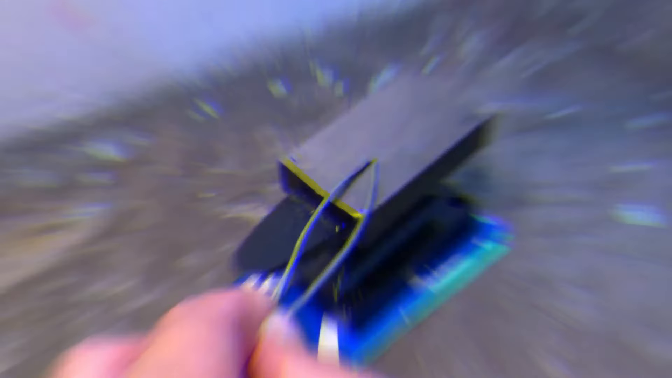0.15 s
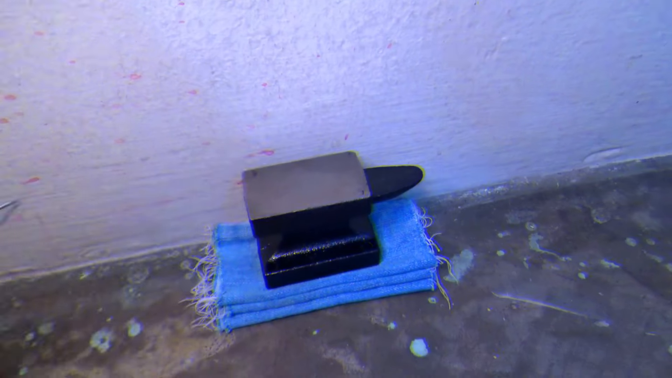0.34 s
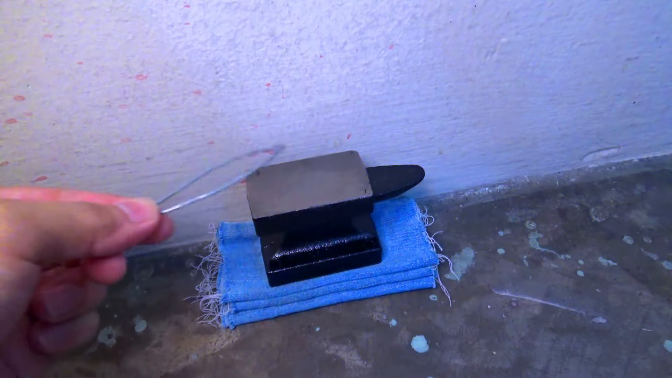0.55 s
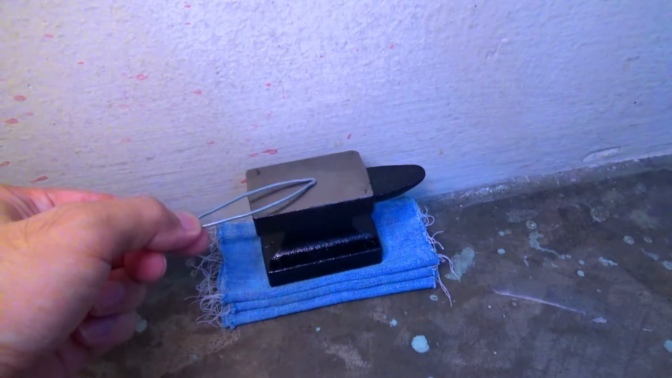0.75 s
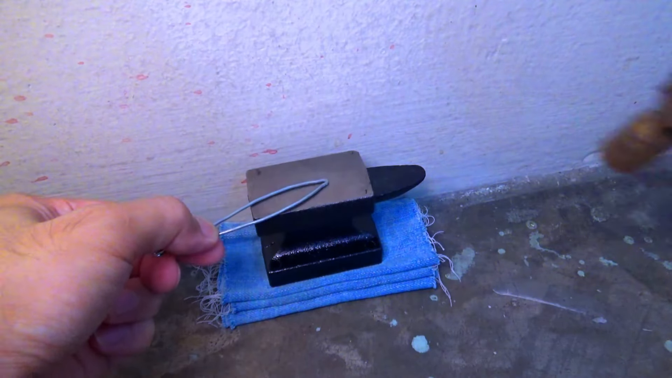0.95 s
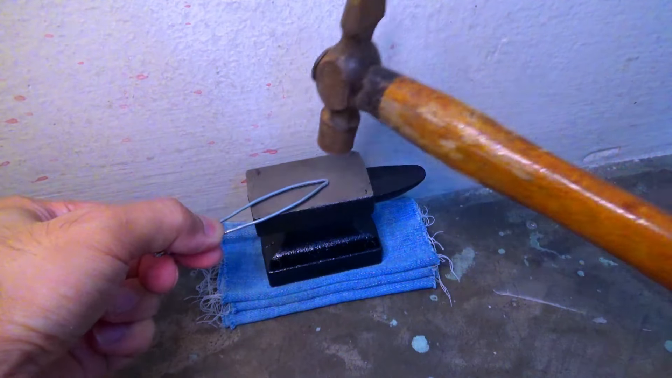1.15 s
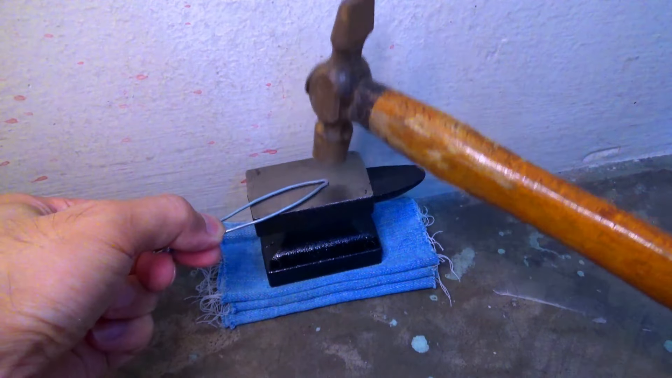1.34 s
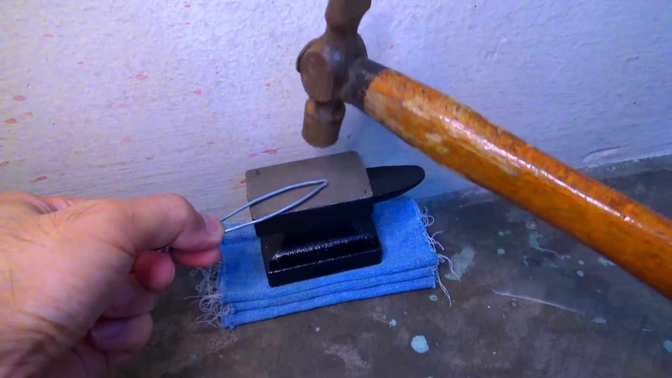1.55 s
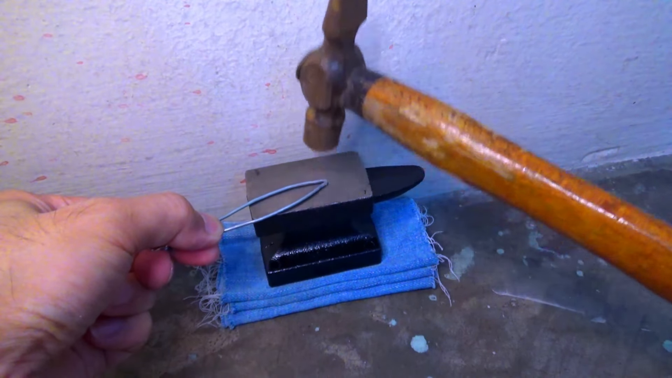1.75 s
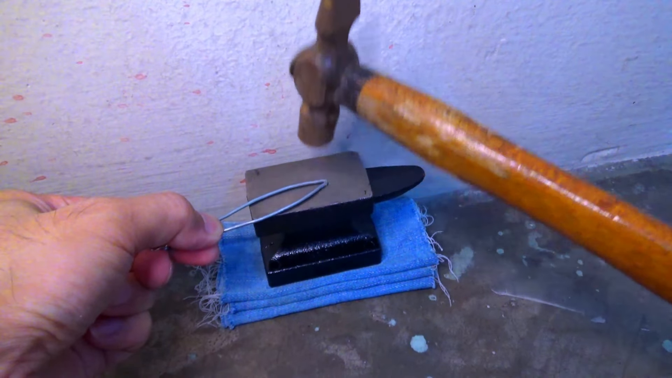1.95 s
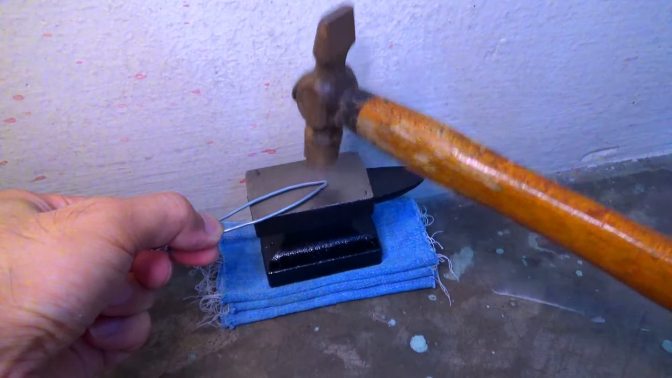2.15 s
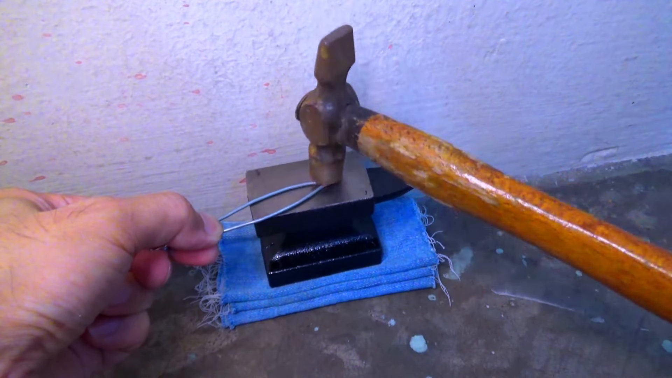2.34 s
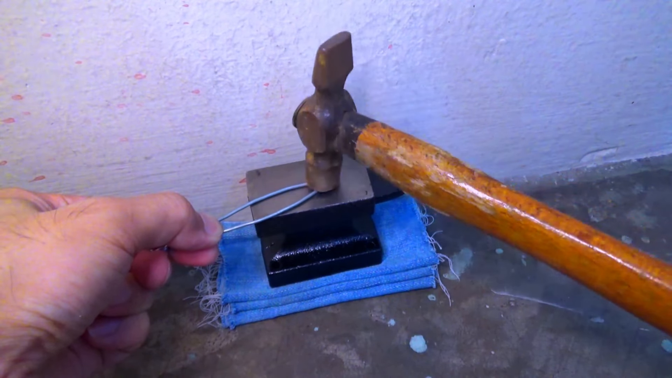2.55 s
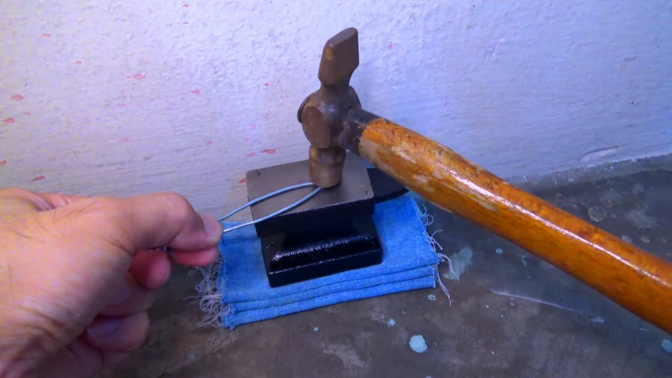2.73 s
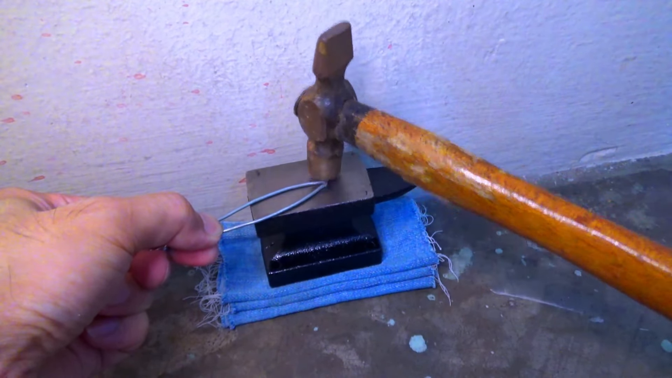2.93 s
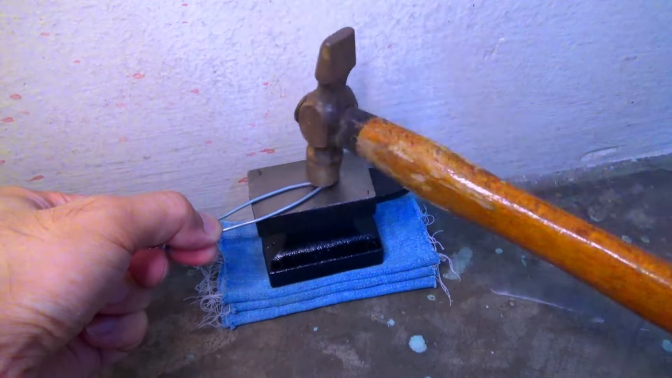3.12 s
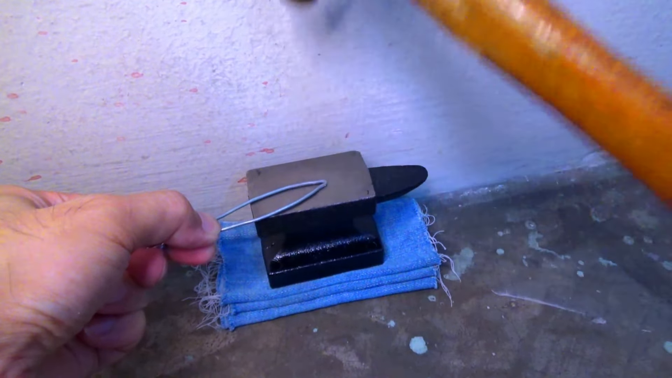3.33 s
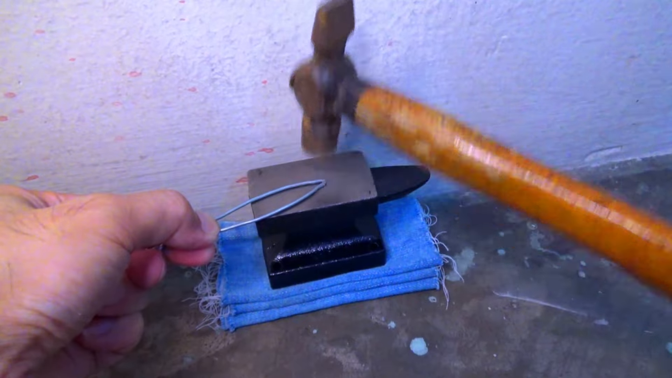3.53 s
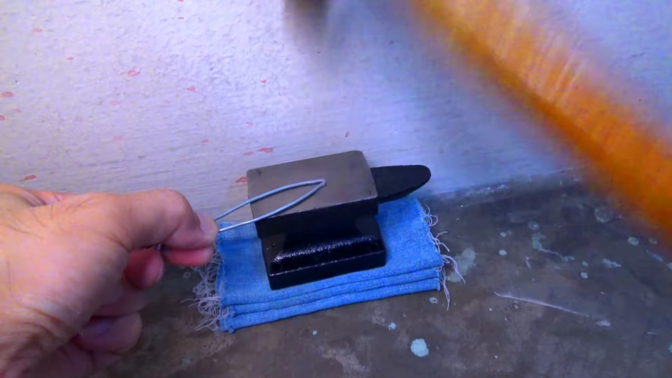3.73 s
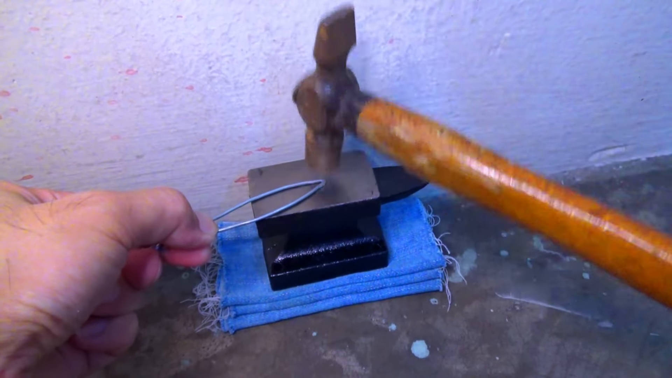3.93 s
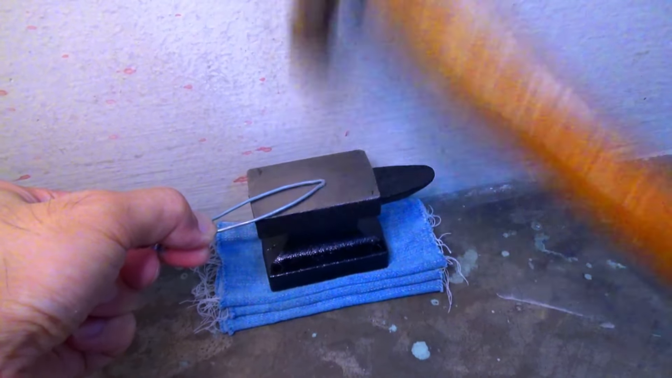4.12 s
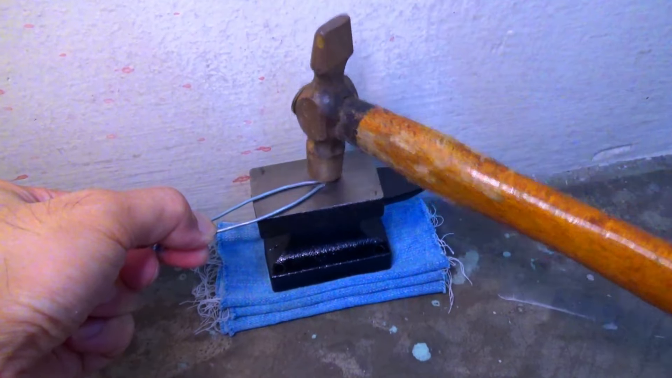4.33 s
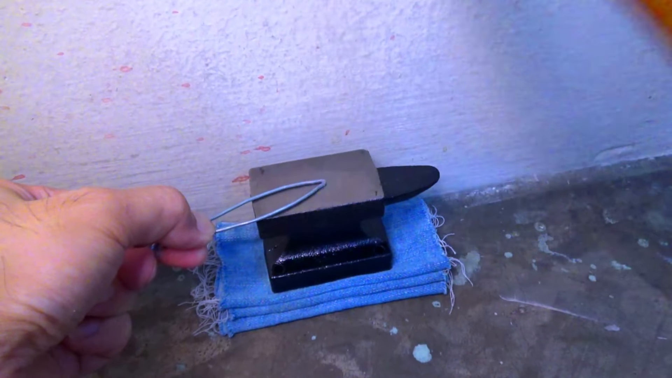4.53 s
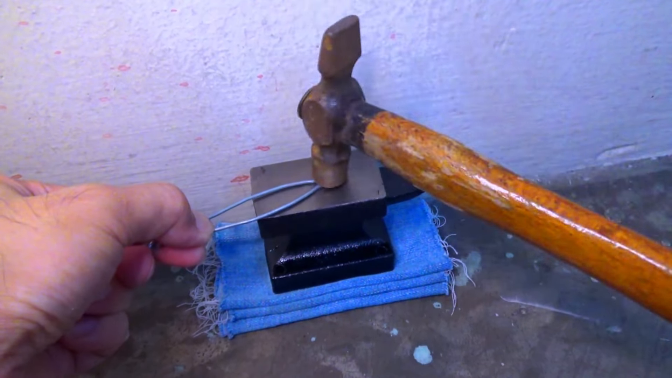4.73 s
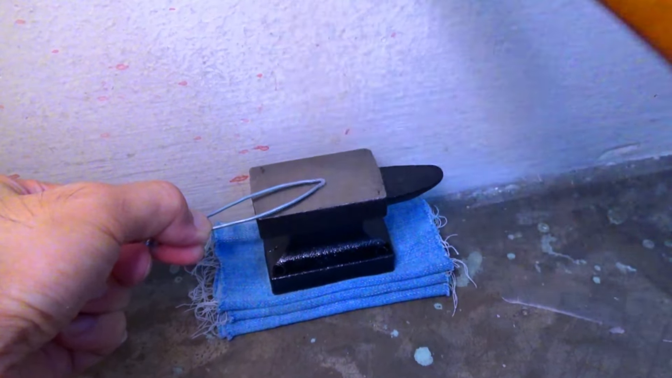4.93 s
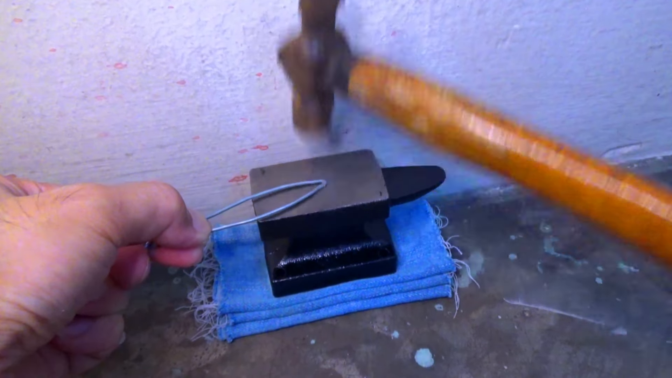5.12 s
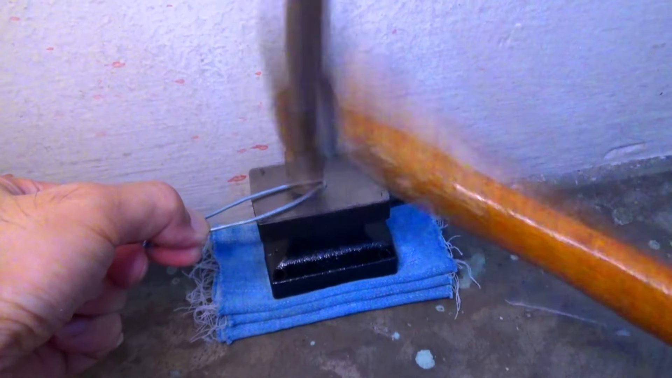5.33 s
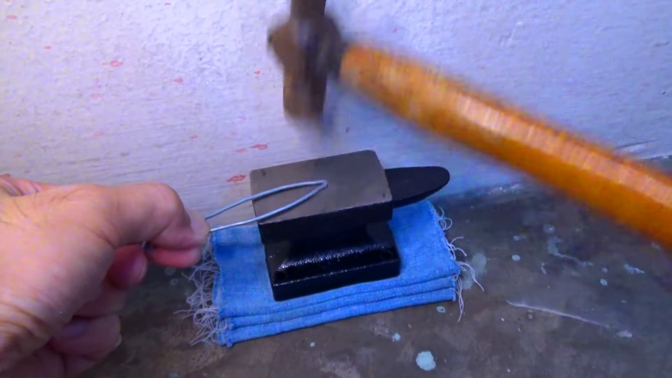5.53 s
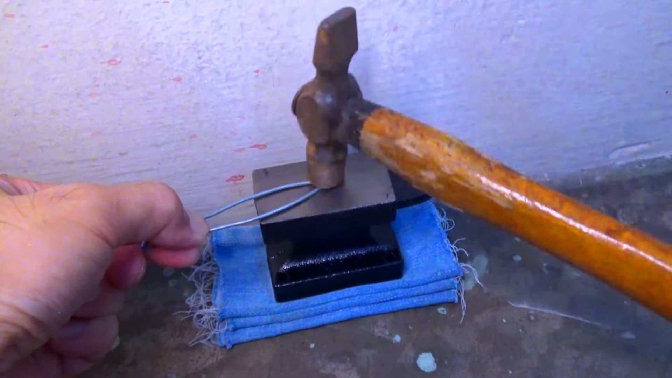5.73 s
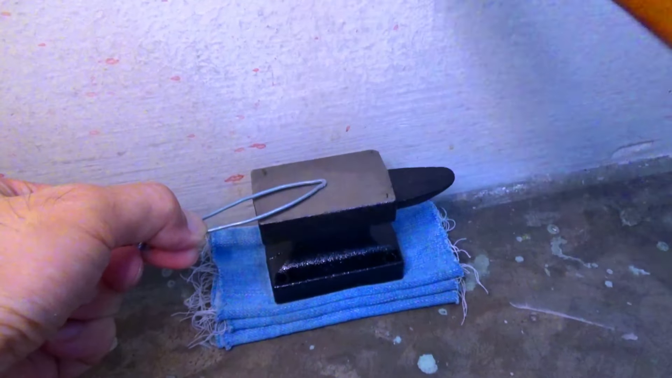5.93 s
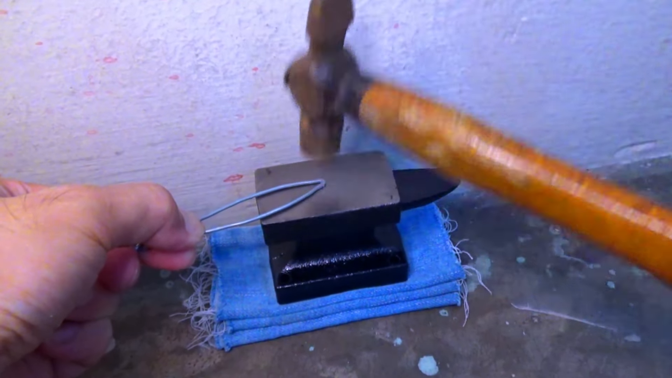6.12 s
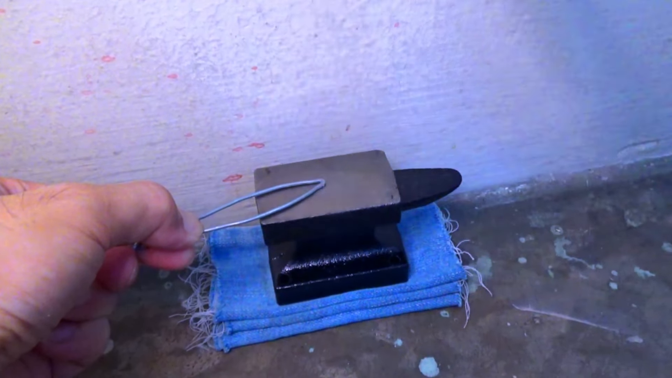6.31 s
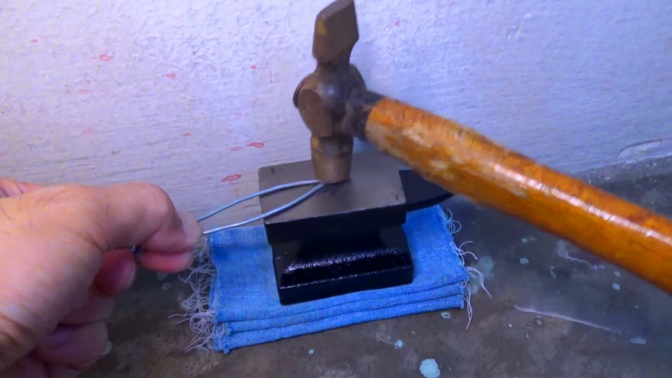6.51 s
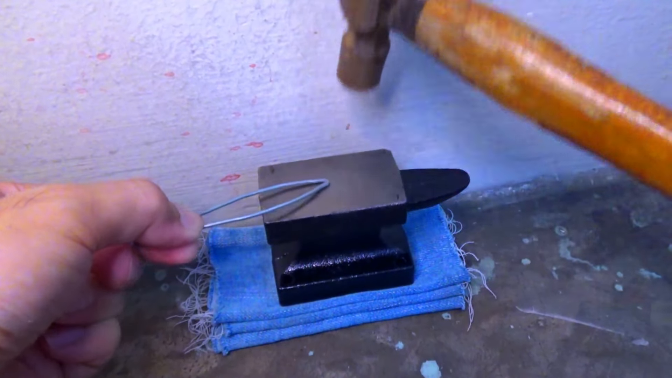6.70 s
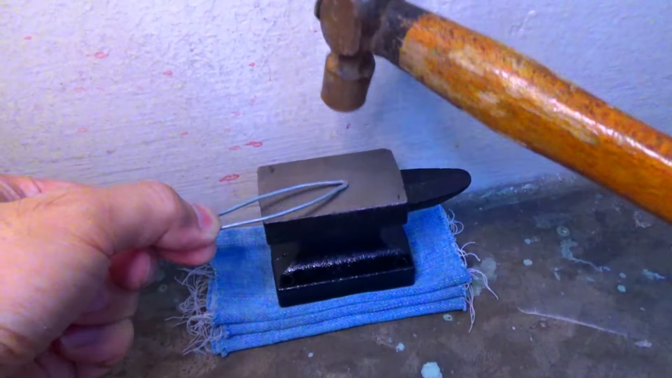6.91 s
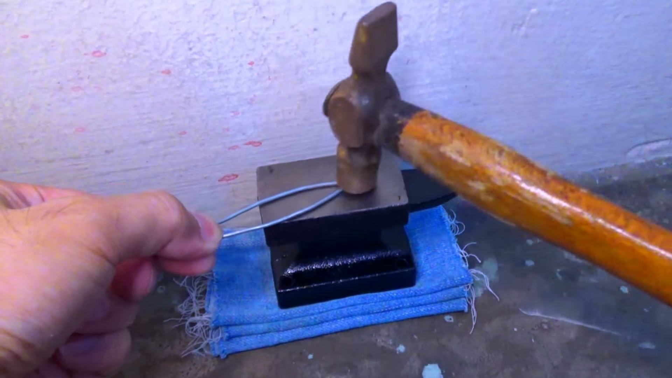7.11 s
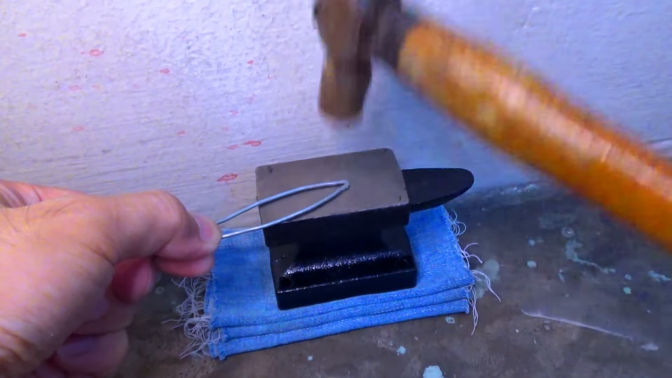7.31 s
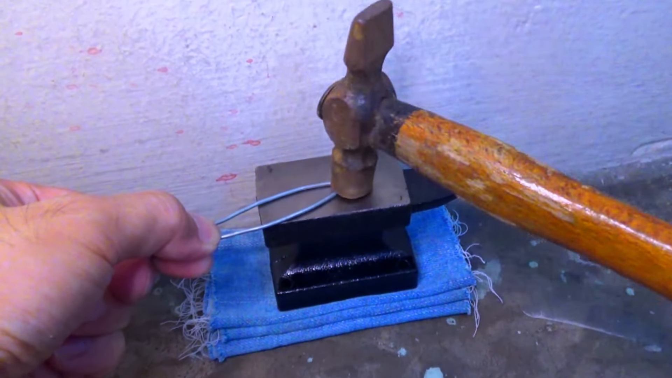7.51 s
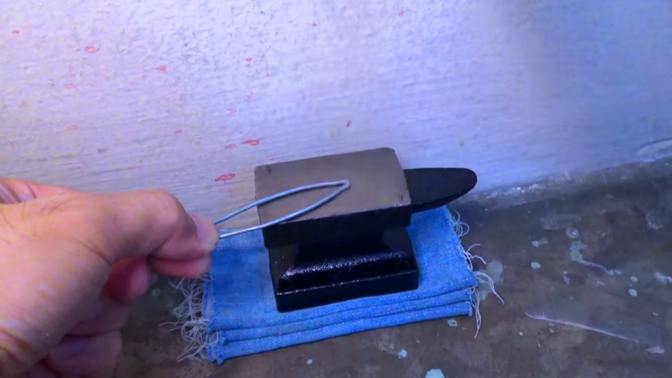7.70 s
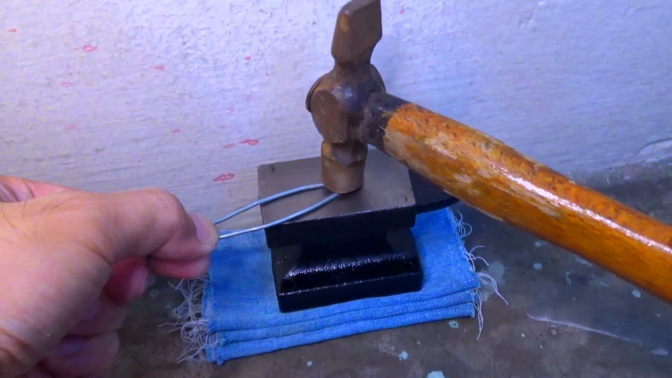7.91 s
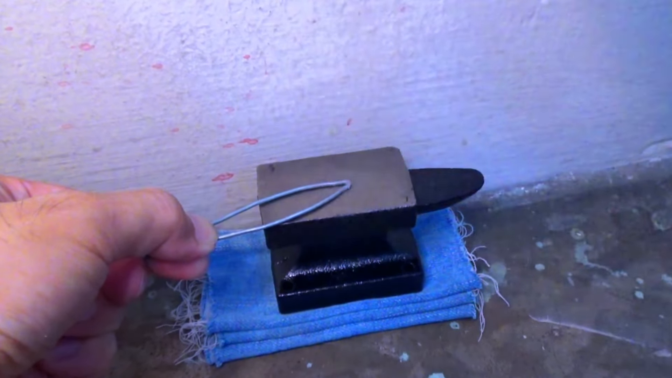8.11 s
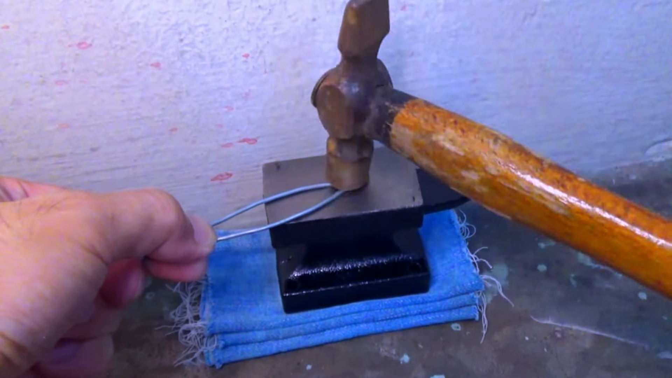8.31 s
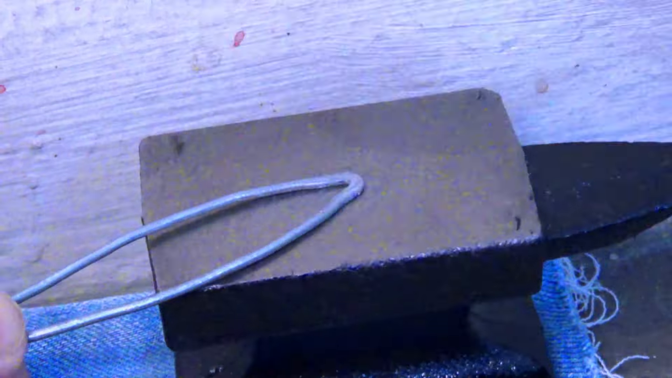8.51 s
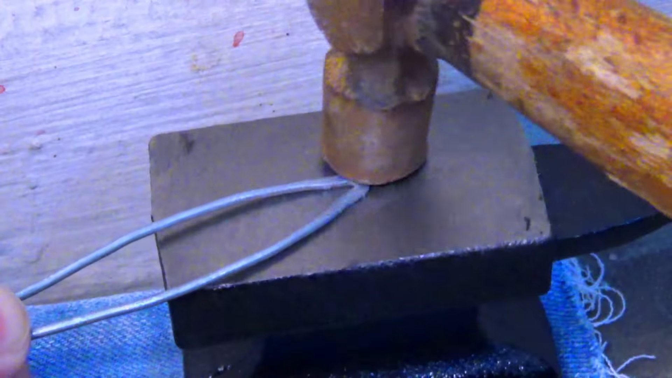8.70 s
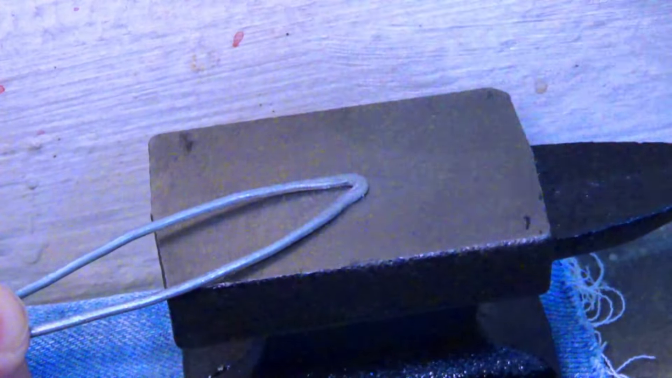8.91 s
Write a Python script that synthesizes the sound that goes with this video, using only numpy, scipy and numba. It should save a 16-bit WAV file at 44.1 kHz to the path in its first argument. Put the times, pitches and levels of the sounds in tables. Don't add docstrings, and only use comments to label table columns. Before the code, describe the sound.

A loud hammer clang is already ringing at the start, with a hollow mid-pitched hum and raised air noise, until a rapid stutter chops it off at about 0.3 s. Near quiet follows: faint touches and a brief singing scrape of wire on steel around 0.75-1.05 s, a light tap at 1.35 s. From 1.47 s a hammer beats the small anvil, softly at first, about five blows a second, with small tinkles near 2.6-2.9 s. From 3.16 s the blows are hard, bright cracks with short high steel rings, 0.3-0.4 s apart, growing brighter until 6.5 s. After a short pause come two softer hits at 7.1 and 7.4 s, then strong ones at 7.8, 8.2 and 8.7 s. Hard room reflections follow every blow, their tails held flat and dense. Beneath lie murmuring air, a faint low engine near 7.5-8.2 s and a distant whirr after 8.5 s.

```python
import sys
import numpy as np
from scipy import signal
from scipy.fft import rfft, irfft
from scipy.io import wavfile
from scipy.ndimage import uniform_filter1d, minimum_filter1d
from numba import njit

SR = 44100
rng = np.random.default_rng(int(sys.argv[2]) if len(sys.argv) > 2 else 0)


def convert_level_to_amplitude(level_db):
    exponent = np.asarray(level_db, float) / 20
    return 10 ** exponent


def transcribe(signal):
    frames = np.atleast_2d(signal).T
    limited = np.clip(frames, -1, 1)
    pcm = np.round(limited * 32767).astype(np.int16)
    wavfile.write(sys.argv[1], SR, pcm)


N = 394694
LEAD = 4410
CHANGE_S = .306

# start in [s], strength in [dB],
# body ring in [dB], face ring in [dB], head ring in [dB].
BLOWS = [(-0.02, -1, -22, -33, 3), (1.4713, -16.5, -36, -41, -56), (1.6911, -12.5, -1.5, -5, -10),
         (1.906, -9.5, -0.5, -3.5, -31), (2.1075, -5.5, 3.5, 0, -2.5), (2.3178, -4.5, 1.5, -4, -10),
         (2.542, -5.5, 2, 2, 3.5), (2.7434, -9.5, 1, -5, -28), (3.1612, -1, 3.5, -9, 5.5),
         (3.4529, 1, 5, -4, -4.5), (3.825, 2, 0, 0, -14), (4.2168, 2, -7, -5, 5.5),
         (4.6545, 2, 1.5, -0.5, -0.5), (5.0657, 0, 3, 4.5, -24), (5.4002, 0, 3.5, -2.5, -8),
         (5.7654, 0.5, 2.5, 5.5, -5), (6.0637, 1, -2, 9.5, 2), (6.4765, 1, -5, 13.5, -3.5),
         (7.121, -12.5, 2.5, -5.5, -6), (7.4093, -7.5, -3.5, 0, -13), (7.8241, 1, -2, 2.5, 0),
         (8.2416, 1, 2, 3, 1), (8.6816, -0.5, -9, 6, -2)]
# start in [s], strength in [dB], brightness in [dB],
# head ring in [dB].
TOUCHES = [
    (0.74, -38, 18.5, 19),
    (1.012, -46, 8, 13),
    (1.355, -26.5, 2.5, -3),
    (2.567, -19, 2, -21),
    (2.765, -16.5, 10, -24),
    (2.872, -21, 4, -32),
]
# pitch in [Hz], level in [dB], T60 in [s],
# partner pitch in [Hz], partner level in [dB].
STEEL_RINGS = [
    (4572, 2.5, .12, 4552, -9),
    (7466, 2.5, .085, 7440, -7),
    (11112, 1, .05, 11145, -5),
]
# pitch in [Hz], level in [dB], T60 in [s], # growth with blow
# strength in [dB per dB].
MINOR_MODES = [(257, -25, 0.05, 1.5), (408, -19, 0.05, 1.2), (724, -19, 0.12, 0.87), (930, -14, 0.09, 0.71),
               (1388, -15, 0.15, 1.2), (1976, -12, 0.1, 1.0), (1890, -18, .06, 1.0),
               (9600, -4, 0.046, 1.37), (10700, -14, 0.13, .8), (13400, -25.5, .09, .6),
               (14800, -24.5, 0.086, .6)]
# pitch in [Hz], level in [dB], T60 in [s].
WIRE_MODES = [(1350, -3, .07), (2160, -3, .045), (3820, -22, .05), (5800, -30, .1), (7260, -18, .04),
              (9520, -22, .1)]
# centre in [s], scrape in [dB], singing in [dB].
WIRE_SLIDES = [
    (.76, -65, -15),
    (0.861, -63.5, 10.5),
    (1.03, -65.5, -18),
    (1.429, -71, -22),
]
# frequency in [Hz], level in [dB per Hz].
CRACK_COLOUR = [(40, -68), (120, -24.5), (260, -18.5), (500, -13), (1000, -3), (2000, 2.5), (3500, 4.5),
                (6000, 1.5), (10000, -2.5), (11500, -20.5), (12500, -29.5), (15000, -21.5), (16500, -45)]
# frequency in [Hz], level in [dB per Hz].
TAP_COLOUR = [(40, -89), (200, -24), (500, 4), (1000, 12), (3000, -0.5), (6000, -7.5), (10000, -5),
              (12000, -21), (16500, -29)]
# frequency in [Hz], level in [dB].
ROOM_COLOUR = [(150, 1), (400, 7.5), (900, 2), (1900, 5.5), (2800, -2), (3700, 3), (5000, -6), (8000, -3.5),
               (11000, -9.5), (15000, 12.5)]
# frequency in [Hz], T60 in [s].
ROOM_T60 = [(200, 0.48), (700, 0.28), (2000, 0.42), (5000, 0.41), (10000, 0.35), (12500, 0.36),
            (15500, 0.034)]
# delay in [s], level in [dB].
ECHOES = [(.0015, 5.5), (.0035, -1.5), (.020, -8.5), (0.027, -33), (0.033, -21), (0.0358, -4.5),
          (0.057, -24), (0.069, -11.5)]
# frequency in [Hz], left-right likeness in [0 to 1].
LIKENESS = [(60, 0.96), (150, 1), (380, 0.99), (950, 0.85), (2380, 0.61), (5980, 0.8), (15000, 0.97)]
# frequency in [Hz], left minus right in [dB].
LEAN = [(60, 0.5), (180, 0), (550, -0.5), (1650, -1), (4970, -0.5), (15000, 1.5)]
# frequency in [Hz], level in [dB per Hz].
AIR_COLOUR = [(20, -38), (39, -17), (60, -15), (99, -35), (125, -2.5), (200, -2), (310, -3), (480, -8.5),
              (760, -1), (1300, -5), (4000, -19), (10000, -29.5), (13000, -51), (16500, -34)]
# time in [s], level in [dB].
AIR_LEVEL = [(.3, -54.5), (1.3, -52), (1.6, -48), (3.0, -47), (7.0, -50.5), (8.95, -47)]
# start in [s], length in [s], edges in [s], level in [dB].
ENGINE = (7.5, .72, .06, -65)
# start in [s], length in [s], level in [dB].
WHIRR = [
    (8.564, .2, -56),
    (8.856, 0.086, -45.5),
]
# start in [s], depth in [dB], hold in [s], recovery in [s].
DROPOUTS = [
    (.295, 23, .0195, .0005),
    (.305, 37, .0095, .0005),
    (.3195, 30, 0, .017),
    (.339, 16, .002, .01),
]


def blows():
    s, db, *rings = np.transpose(BLOWS)
    worked_s = np.where(s < 0, 4, s)
    bright_db = 2.5 + 0.71 * db + 1.0352 * worked_s
    return np.transpose([s, db, bright_db, *rings])


def touches():
    body_db, face_db = -25, -21
    return [(s, db, bright_db, body_db, face_db, head_db) for s, db, bright_db, head_db in TOUCHES]


def contact_clicks(rows, at, split_hz):
    size = 176
    crumbs = .07 * rng.standard_normal((len(rows), size)) * np.exp(-np.arange(size) / 50)
    clicks, bright, sizzle = np.zeros((3, N + LEAD))
    for i, row, crumb in zip(at, rows, crumbs):
        contact = crumb + (np.arange(size) == 0)
        strength_db, bright_db = row[1:3]
        clicks[i:i + size] += convert_level_to_amplitude(strength_db) * contact
        bright[i:i + size] += convert_level_to_amplitude(strength_db) * (convert_level_to_amplitude(bright_db) - 1) * contact
        sizzle[i:i + size] += convert_level_to_amplitude(0.7 * strength_db + 0.2 * bright_db - 14.0) * contact
    clicks += butter(bright, 2, split_hz, "high")
    return clicks + butter(sizzle, 4, 11800, "high")


def smear(x, gain):
    for lag in (5, 13, 29):
        loop = np.r_[1, np.zeros(lag - 1), gain]
        x = signal.lfilter(loop[::-1], loop, x)
    return x


def strike(rows, colour, crack_db, ring_db, split_hz):
    rows = np.array(rows)
    at = np.round(rows[:, 0] * SR).astype(int) + LEAD
    strength_db = rows[:, 1]
    clicks = contact_clicks(rows, at, split_hz)
    rattle = smear(clicks + 1e-18, gain=0.83)
    crack = convert_level_to_amplitude(crack_db) * signal.fftconvolve(rattle, causal_pulse(colour))[:N + LEAD]
    spread_db = rng.normal(0, 2.5, (len(rows), len(MINOR_MODES)))
    rings, low_modes = np.zeros((2, N + LEAD))
    push = np.zeros(N + LEAD)
    for (hz, db, t60, partner_hz, partner_db), own_db in zip(STEEL_RINGS, rows[:, 3:].T):
        push[at] = convert_level_to_amplitude(strength_db + db + own_db + ring_db)
        rings += ring(push, hz, t60) + convert_level_to_amplitude(partner_db) * ring(push, partner_hz, t60)
    for (hz, db, t60, growth), own_db in zip(MINOR_MODES, spread_db.T):
        grown_db = np.minimum(growth * strength_db, strength_db + 8.9)
        push[at] = convert_level_to_amplitude(grown_db + db + own_db + ring_db)
        part = low_modes if hz < 2500 else rings
        part += ring(push, hz, t60)
    return crack, rings, low_modes


def wire():
    t = (np.arange(N + LEAD) - LEAD) / SR
    grit = rng.standard_normal(N + LEAD)
    pressure, sing = np.zeros((2, N + LEAD))
    for s, scrape_db, sing_db in WIRE_SLIDES:
        stroke = convert_level_to_amplitude(scrape_db) * np.exp(-((t - s) / 0.019) ** 2)
        pressure += stroke
        sing += convert_level_to_amplitude(sing_db) * stroke
    scrape = 3.4 * signal.lfilter([.5], [1, -.6], grit * pressure)
    song = sum(0.3 * convert_level_to_amplitude(db) * ring(grit * sing, hz, t60) for hz, db, t60 in WIRE_MODES)
    return scrape, song


def hollow_support():
    return convert_level_to_amplitude(-39) * ring(np.arange(N + LEAD) == LEAD - 880, 750, 1.0)


def workshop(x, tail_db, build_s, echo_hz):
    t = np.arange(SR) / SR

    def tail_gain(hz):
        gather_s = build_s + 0.014 / (1 + (hz / 2940) ** 2)
        build = 1 - np.exp(-(t / gather_s) ** 2)
        return build * convert_level_to_amplitude(at_hz(ROOM_COLOUR, hz) - 60 * t / at_hz(ROOM_T60, hz))

    walls = np.zeros((2, SR))
    for s, db in ECHOES:
        walls[[0, 1], round(s * SR) + rng.integers(0, 4, 2)] = convert_level_to_amplitude(db)
    echoes = signal.lfilter(*signal.butter(2, echo_hz, fs=SR), walls)
    answer = convert_level_to_amplitude(tail_db) * stereo_bands(SR, tail_gain) + echoes
    return signal.fftconvolve(x[None], answer, axes=1)


def passing_engine():
    start, length, edge, db = ENGINE
    t = np.arange(N) / SR - start
    hz = 55 + 8 / 2 * t
    return convert_level_to_amplitude(db) * swell(start, length, edge) * np.sin(2 * np.pi * hz * t)


def far_whirr(edge_s):
    bursts = sum(convert_level_to_amplitude(db) * swell(start, length, edge_s) for start, length, db in WHIRR)
    return bursts * rms_one(ring(rng.standard_normal(N), 903, 0.054))


def background():
    t = np.arange(N) / SR
    steps = np.arange(0, N + 4410, 4410)
    edge_s = .015

    def patches(hz):
        patch_db = at_hz(AIR_COLOUR, hz) + 2.1 * rng.standard_normal(len(steps))
        return np.interp(np.arange(N), steps, convert_level_to_amplitude(patch_db))

    air = rms_one(stereo_bands(N, patches))
    air_db = np.interp(t, *np.transpose(AIR_LEVEL))
    air_db += 20.5 * np.maximum(1 - t / CHANGE_S, 0)
    air_db += 2 * swell(WHIRR[0][0], 1, edge_s)
    return convert_level_to_amplitude(air_db) * air + passing_engine() + far_whirr(edge_s)


def butter(x, order, hz, kind="low"):
    return signal.sosfilt(signal.butter(order, hz, kind, fs=SR, output="sos"), x)


def rms_one(x):
    return x / np.sqrt(np.mean(x ** 2) + 1e-20)


def at_hz(points, hz):
    point_hz, value = np.transpose(points)
    return np.interp(np.log(hz), np.log(point_hz), value)


def swell(start, length, edge):
    t = np.arange(N) / SR - start
    return np.clip(np.minimum(t, length - t) / max(edge, 1e-3), 0, 1)


def ring(clicks, hz, t60):
    r = convert_level_to_amplitude(-60 / (t60 * SR))
    w = 2 * np.pi * hz / SR
    return signal.lfilter([0, np.sin(w)], [1, -2 * r * np.cos(w), r * r], clicks + 1e-18)


def causal_pulse(spectrum, size=2048):
    hz = np.maximum(np.arange(size // 2 + 1) * SR / size, 1)
    cepstrum = irfft(np.log(convert_level_to_amplitude(at_hz(spectrum, hz))))
    cepstrum[1:size // 2] *= 2
    cepstrum[size // 2 + 1:] = 0
    pulse = irfft(np.exp(rfft(cepstrum)))
    return pulse / np.sqrt(np.sum(pulse ** 2))


def stereo_bands(size, gain_of_band):
    out = 0
    edges = 22 * 2 ** (np.arange(30) / 3)
    white = rng.standard_normal((2, 2, size))
    flip = np.array([[1], [-1]])
    for k, (low, high) in enumerate(zip(edges, edges[1:])):
        mid, side = butter(white[k % 2], 2, [low, high], "band")
        hz = np.sqrt(low * high)
        alike = np.clip(at_hz(LIKENESS, hz), 0, 1)
        lean = convert_level_to_amplitude(at_hz(LEAN, hz) / 2 * flip)
        pair = np.sqrt(1 + alike) * mid + np.sqrt(1 - alike) * side * flip
        out = out + gain_of_band(hz) * lean * pair
    return out


def scene():
    crack, rings, low_modes = strike(blows(), CRACK_COLOUR, crack_db=17.5, ring_db=-8.0, split_hz=5410)
    tap, tinkle, _ = strike(touches(), TAP_COLOUR, crack_db=15.5, ring_db=-28.0, split_hz=5300)
    scrape, song = wire()
    rings = rings + tinkle + song + hollow_support()
    send = crack + scrape + convert_level_to_amplitude(-8) * tap + convert_level_to_amplitude(-18) * rings + convert_level_to_amplitude(-5.5) * low_modes
    direct = crack + scrape + tap + rings + convert_level_to_amplitude(-12) * low_modes
    room = workshop(send, tail_db=-31.5, build_s=0.00154, echo_hz=4100)
    sound = direct[LEAD:] + room[:, LEAD:N + LEAD]
    sound = butter(sound, 6, 150, "high")
    change = round(CHANGE_S * SR)
    sound[:, change:change + round(.4 * SR)] *= convert_level_to_amplitude(-27)
    return sound + background()


@njit
def follow(level, rise, fall):
    out, held = np.empty_like(level), level[0]
    for i in range(len(level)):
        held += (rise if level[i] > held else fall) * (level[i] - held)
        out[i] = held
    return out


def excess_db(x, rise_s, fall_s, threshold_db):
    envelope = follow(np.abs(x).max(axis=0), 1 / (rise_s * SR), 1 / (fall_s * SR))
    return np.maximum(20 * np.log10(envelope + 1e-9) - threshold_db, 0)


def limiter(upper):
    over_db = excess_db(upper, .0001, 0.0055, -11.16)
    ahead_db = uniform_filter1d(-minimum_filter1d(-over_db, size=88, origin=-44), size=66)
    held = upper * convert_level_to_amplitude(-.85 * ahead_db)
    return held * convert_level_to_amplitude(-.6 * excess_db(held, 0.011, .06, -15.8))


def dropouts():
    t = np.arange(N) / SR
    loss_db = 0
    for s, db, hold, back in DROPOUTS:
        loss_db = loss_db + db * (t >= s) * np.clip(1 - (t - s - hold) / back, 0, 1)
    return convert_level_to_amplitude(-loss_db)


def roll_off(x):
    return signal.sosfilt(signal.butter(12, 16510, fs=SR, output="sos"), x)


def record(dry):
    bass = butter(dry, 6, 100)
    held = bass + butter(limiter(dry - bass), 4, 100, "high")
    held = butter(held, 14, 15400)
    ceiling = .76
    rounded = ceiling * np.tanh(held / ceiling)
    return roll_off(rounded * dropouts())


dry = scene()
out = record(dry)
transcribe(out)
```